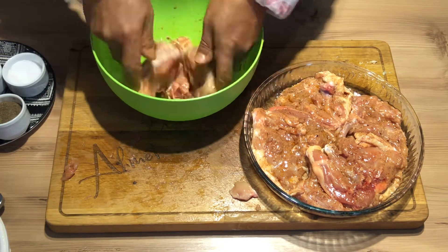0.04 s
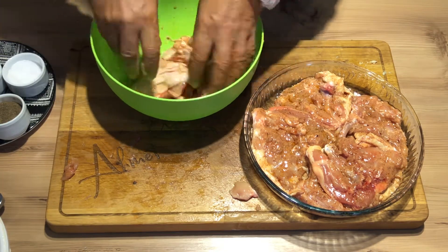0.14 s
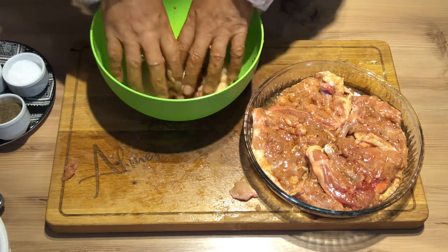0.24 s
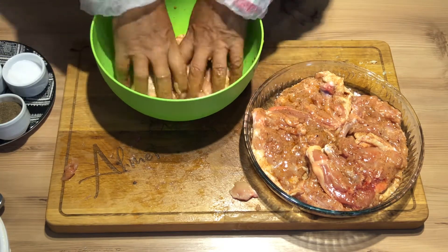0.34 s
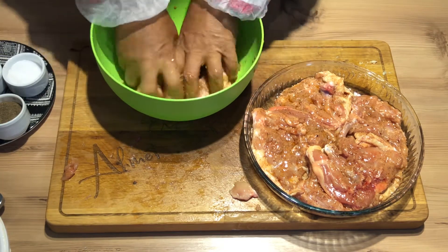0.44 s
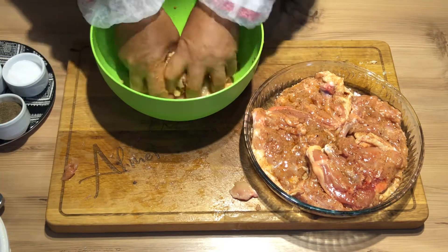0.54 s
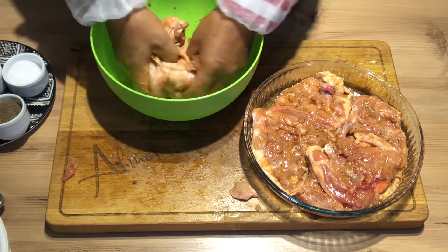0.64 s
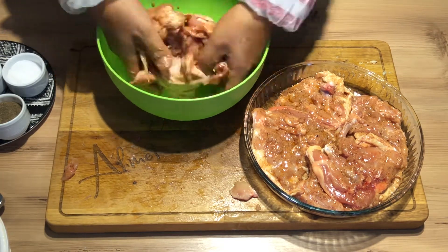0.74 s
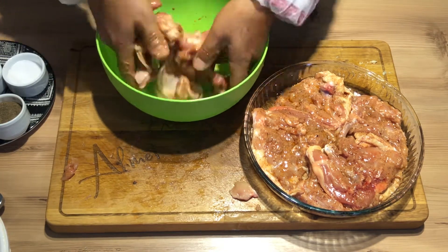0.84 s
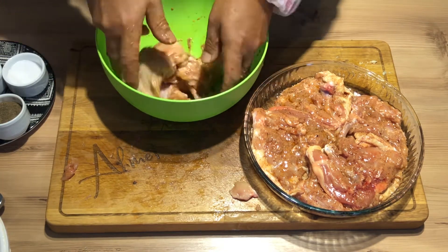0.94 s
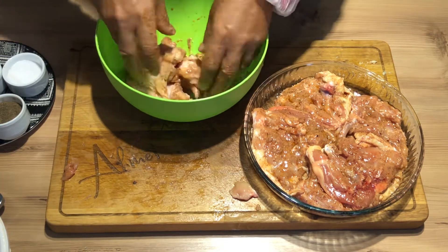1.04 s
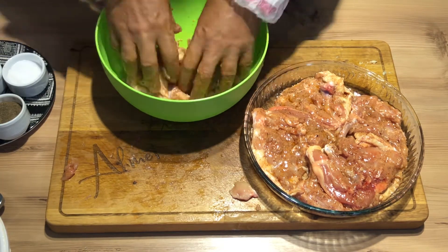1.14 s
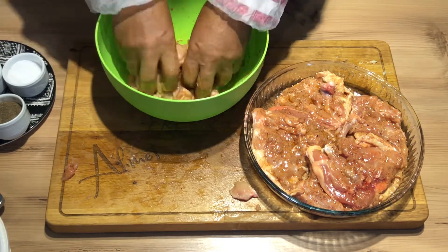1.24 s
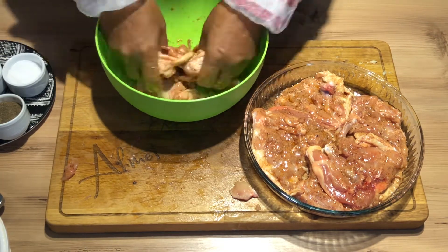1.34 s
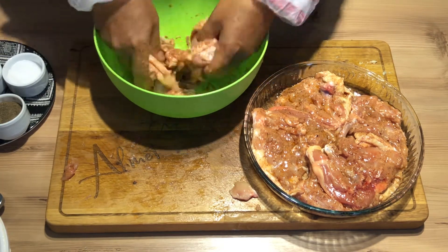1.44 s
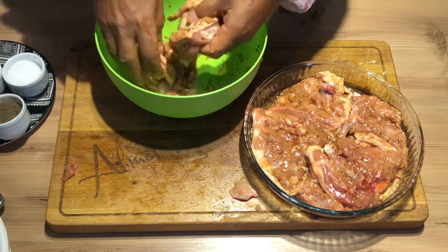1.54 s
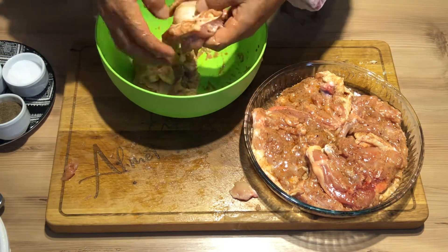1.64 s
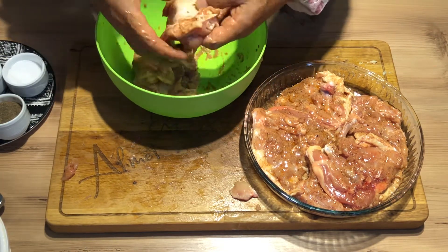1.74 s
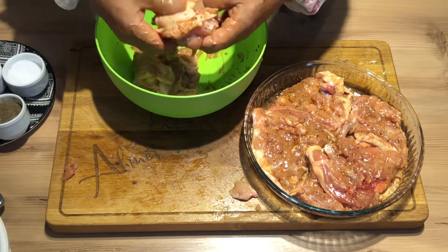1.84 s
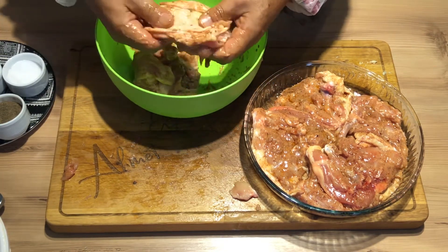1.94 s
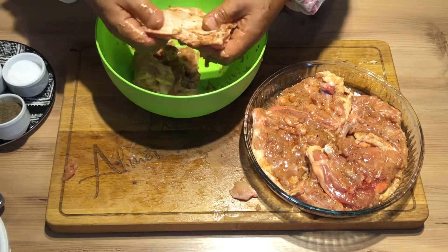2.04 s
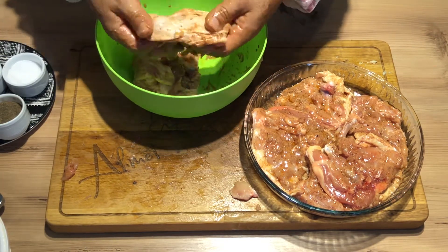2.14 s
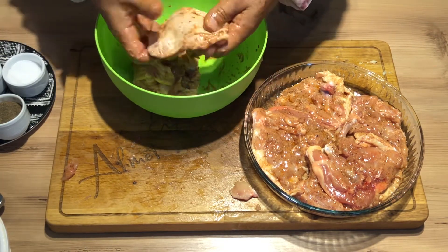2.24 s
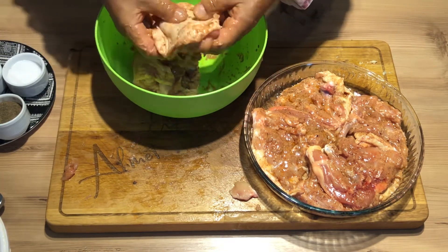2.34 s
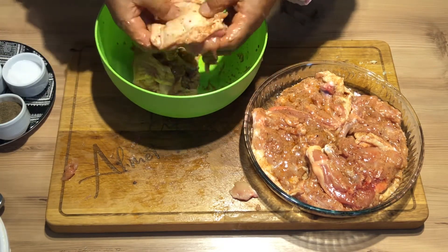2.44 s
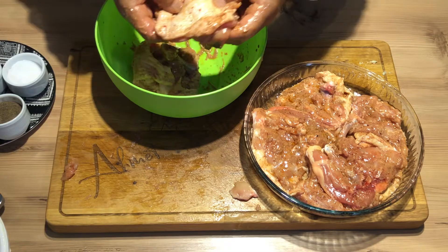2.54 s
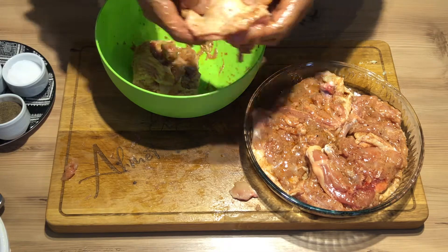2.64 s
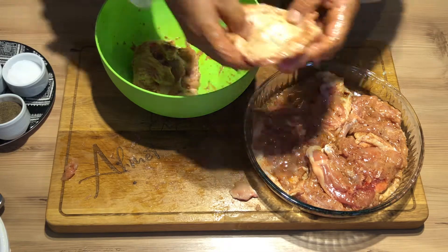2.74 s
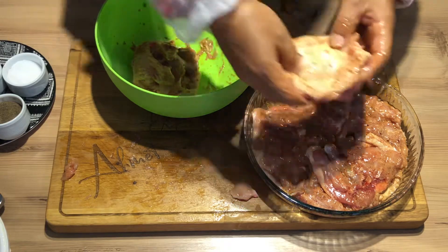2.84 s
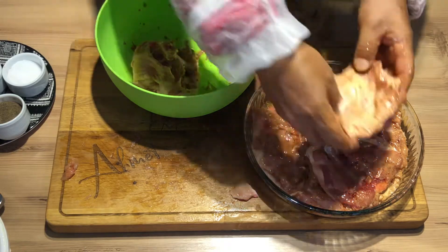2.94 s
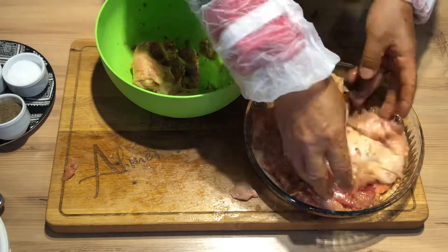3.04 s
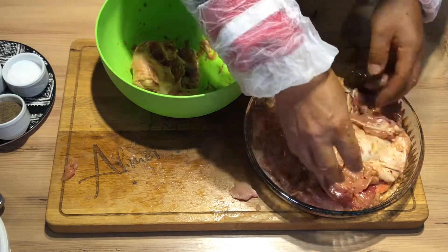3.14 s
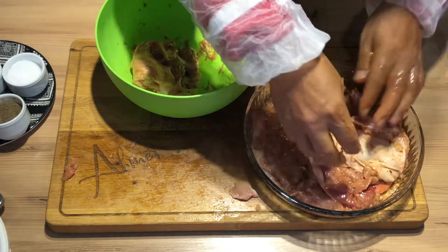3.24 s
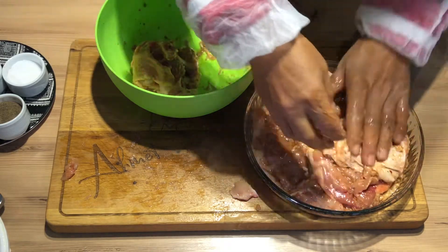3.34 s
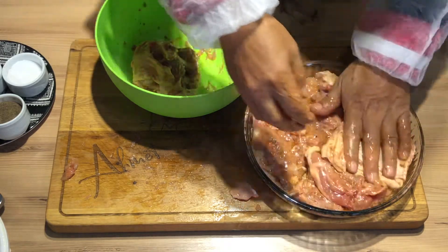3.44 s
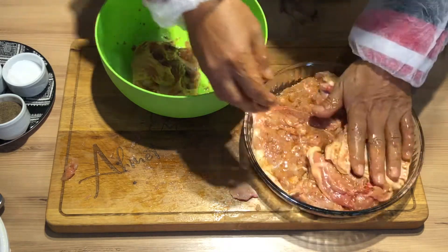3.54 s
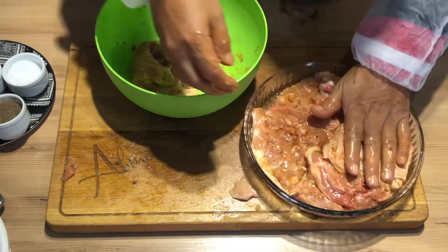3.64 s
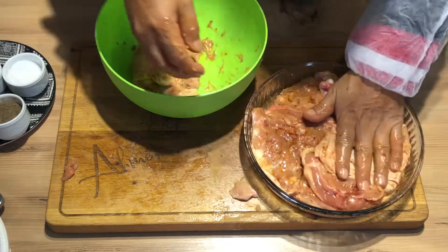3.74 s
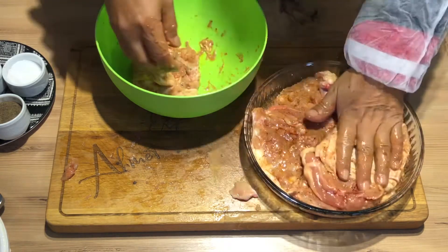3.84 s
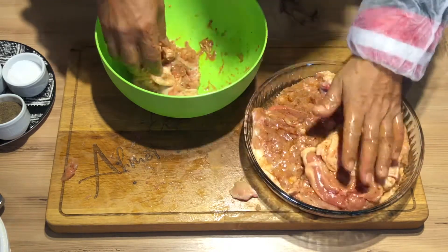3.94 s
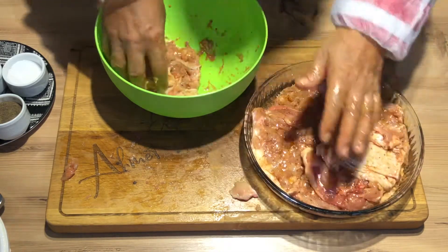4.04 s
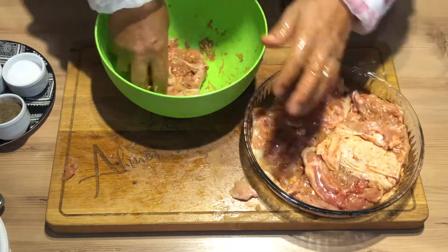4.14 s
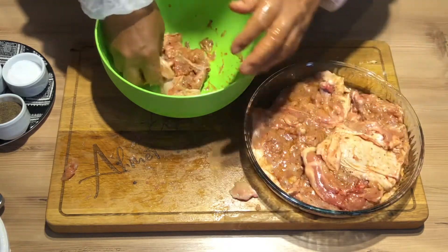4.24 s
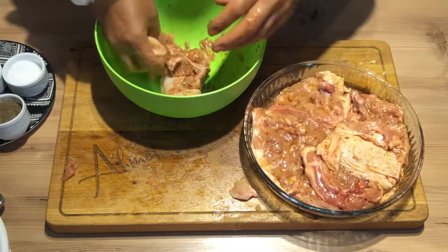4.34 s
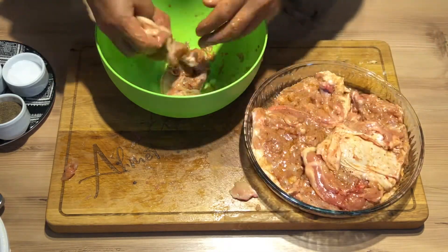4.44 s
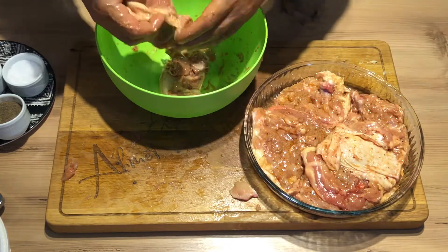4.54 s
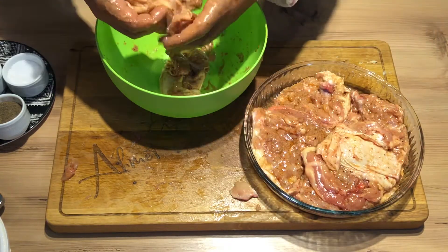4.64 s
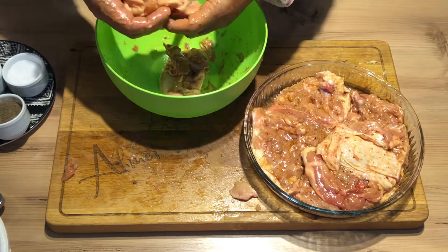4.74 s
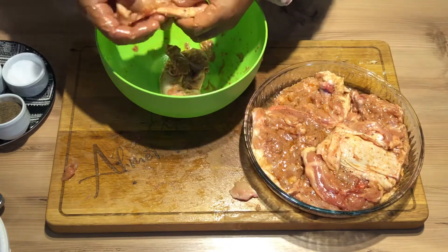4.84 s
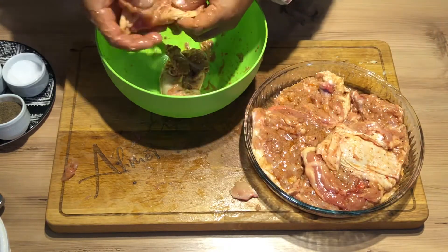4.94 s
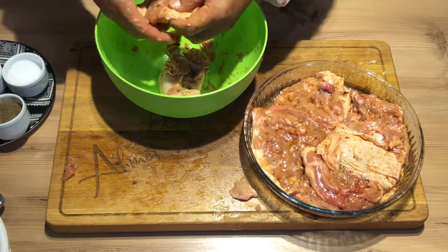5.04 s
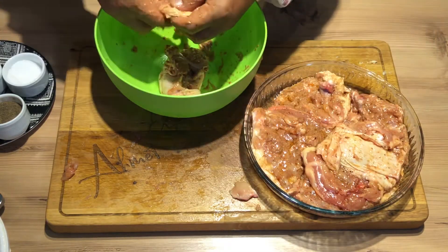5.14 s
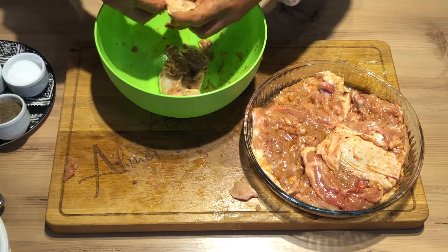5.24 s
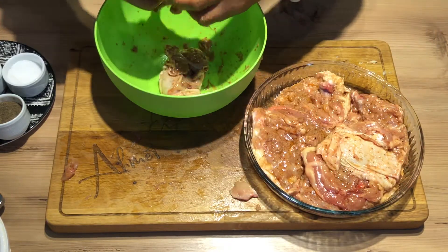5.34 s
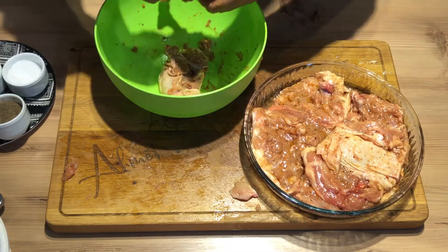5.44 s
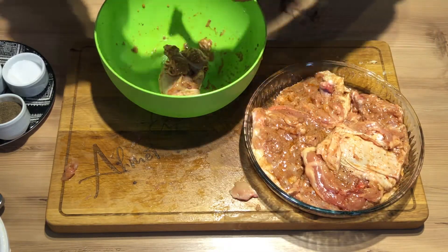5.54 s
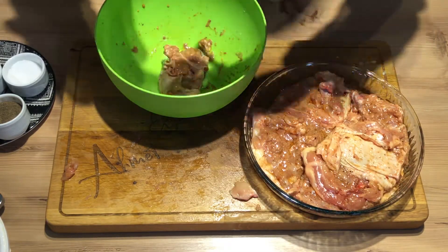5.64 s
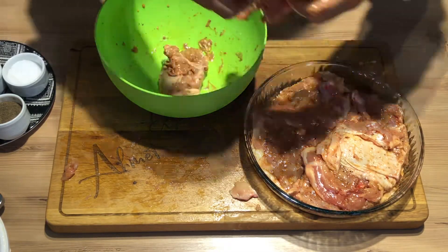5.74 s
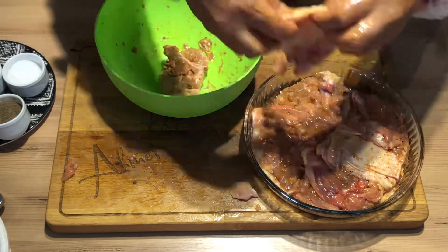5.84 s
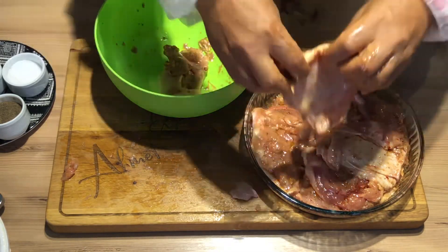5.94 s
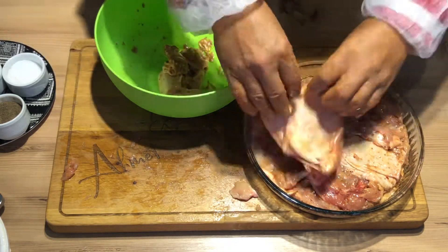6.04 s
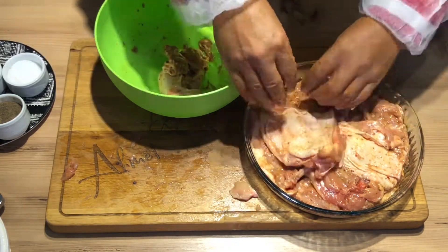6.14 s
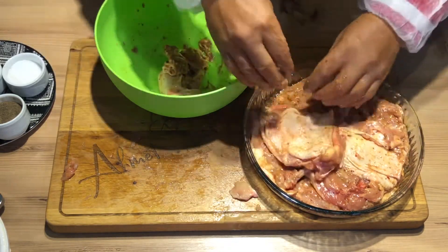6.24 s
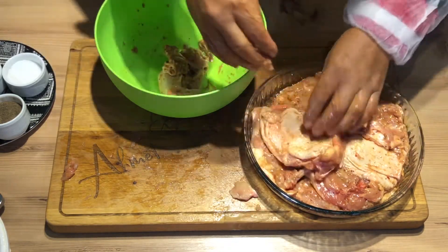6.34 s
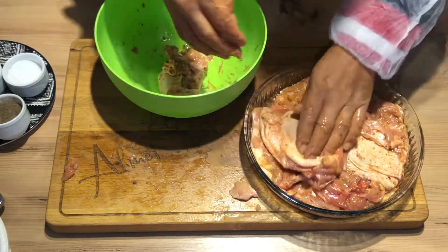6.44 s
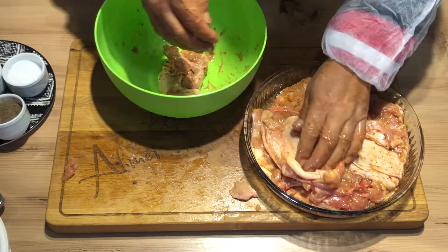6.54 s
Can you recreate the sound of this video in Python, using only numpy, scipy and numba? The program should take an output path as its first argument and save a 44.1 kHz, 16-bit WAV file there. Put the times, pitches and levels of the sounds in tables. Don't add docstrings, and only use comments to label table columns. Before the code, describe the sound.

A phone microphone hangs just above a wooden board in a small hard kitchen, with a faint steady fridge hum. From 0 to 1.6 seconds hands knead wet, sauce-covered meat in a plastic bowl: busy gulping pops, tearing crackles and squishes, with hollow bowl thuds, strongest near 0.76, 0.87 and 1.46, and low board bumps. From 1.7 to 2.9 it thins to sparse sticky ticks and tiny snaps. At 3.03 a loud suction smack bursts, a brief squeak and sharp crack with a hollow low pop, fizzing and echoing shortly. From 3.4 to 4.4 a palm presses and peels, with moist pops, squishes and crackles. From 4.5 to 6 only quiet sticky clicks remain, with a soft bowl knock at 5.1. At 6.08 a splashy wet slap makes a glass dish ring and chatter, fading under small ticks until about 6.6.

```python
import sys
import numpy as np
from scipy import signal
from scipy.fft import rfft, irfft
from scipy.io import wavfile
from numba import njit

SR = 44100
rng = np.random.default_rng(int(sys.argv[2]) if len(sys.argv) > 2 else 0)


def dump(signal):
    limited = np.clip(np.atleast_2d(signal).T, -1, 1)
    pcm = np.round(limited * 32767).astype(np.int16)
    wavfile.write(sys.argv[1], SR, pcm)


def level_to_linear(level):
    exponent = np.asarray(level, float) / 20
    return 10 ** exponent


N = 290619
TIME = np.arange(N) / SR

# [t/s, effort/dB, thinness of the sauce film/dB]
KNEADING = [(0.0, -57.5, -4), (0.11, -48.5, -9), (0.17, -60.5, -16), (0.27, -65.5, -5), (0.33, -53, -2.5),
            (0.92, -56.5, -5.5), (1.08, -64, -12), (1.25, -60, 2.5), (1.58, -64.5, -4.5), (1.8, -76, 3),
            (2.9, -69, -1), (3.65, -62.5, -8.5), (4.02, -66, -10), (4.06, -54.5, -6), (4.37, -68.5, 1.5),
            (4.99, -69, -14.5), (6.04, -66, -1.5), (6.59, -75, 1)]
# [t/s, peak level/dB,
# f/Hz]
POPS = [(0.0483, -37.5, 900), (0.0685, -35.5, 1120), (0.3661, -44, 890), (0.413, -34.5, 1550),
        (0.5556, -39, 1260), (0.5864, -40.5, 880), (0.6135, -31, 4940), (0.6598, -39, 1800),
        (0.7185, -47, 1670), (0.739, -36, 1700), (0.851, -45, 1020), (0.867, -35.5, 1000),
        (0.9065, -48, 1100), (1.1703, -45.5, 1530), (1.2511, -36, 5550), (1.2925, -37.5, 3500),
        (1.3061, -31, 5830), (1.35, -41, 2080), (1.3713, -39.5, 3060), (1.3987, -40.5, 3100),
        (1.445, -36, 1130), (1.4634, -45, 980), (1.5439, -39, 1310),
        (1.7607, -39, 5600), (1.8337, -40.5, 4550), (1.89, -39, 5540), (1.895, -51, 1780),
             (2.0103, -47, 6460), (2.111, -45, 5900), (2.1834, -49.5, 1540), (2.4372, -45.5, 3000),
             (2.8986, -49.5, 1300), (2.9118, -43.5, 1380), (2.9484, -33.5, 4640), (4.566, -48.5, 2160),
             (4.8051, -39.5, 2320), (4.8339, -31.5, 4070), (4.886, -38.5, 3140), (5.1054, -51, 1730),
             (5.202, -47.5, 3910), (5.2245, -47, 6220), (5.3652, -49, 4030), (5.9643, -50.5, 3950),
             (6.4428, -47, 6700), (6.48, -38.5, 2400),
        (3.374, -47, 1670), (3.4118, -38, 1850), (3.4417, -64, 1890), (3.461, -42, 4380),
              (3.5627, -44, 5240), (3.6495, -44.5, 4100), (3.6792, -34, 1080), (3.761, -32, 3800),
              (3.7958, -36.5, 3540), (3.8622, -38.5, 2300), (3.8805, -38, 3760), (3.902, -33.5, 1250),
              (3.926, -33, 5870), (4.15, -38.5, 3630), (4.1814, -33, 4970), (4.2289, -38, 5050),
              (4.2917, -36, 6700),
        (0.0483, -37, 1550), (.1012, -41, 2150), (.447, -35, 5400), (0.576, -39, 3340),
             (.866, -32.5, 1960), (.948, -32, 4740), (1.225, -43.5, 846), (1.464, -33, 1580),
             (1.6, -47, 800), (2.277, -49.5, 1670), (3.442, -42.5, 4300), (3.6785, -30.5, 3820),
             (3.775, -45, 1780), (3.902, -36.5, 4130), (4.042, -37.5, 2770), (4.805, -46, 4500),
             (4.306, -37.5, 6260)]
# [t/s, peak level/dB, f/Hz]
SNAPS = [(0.058, -33, 15000), (0.1016, -35.5, 7300), (0.2828, -50, 7850), (0.327, -43, 13100),
         (0.382, -37, 7660), (0.402, -37, 7200), (0.4467, -38, 7540), (0.4842, -41, 10500),
         (0.5306, -41, 13700), (0.7048, -43, 10200), (0.728, -34, 15500), (0.825, -44, 11100),
         (0.8484, -37, 9500), (0.8652, -38, 10500), (0.9094, -34, 13300), (0.943, -29, 13400),
         (1.1807, -45, 7140), (1.2044, -39.5, 7200), (1.2241, -41, 13600), (1.286, -45, 9850),
         (1.306, -37, 7450), (1.3637, -38, 10200), (1.5184, -54, 11900), (1.536, -46, 7640),
         (1.7599, -62, 7450), (1.8452, -51, 7700), (1.9565, -44, 13700), (1.972, -41.5, 11100),
              (2.0105, -42.5, 7340), (2.0476, -39, 12700), (2.172, -42, 13200), (2.226, -43, 10000),
              (2.2827, -48, 12000), (2.368, -42, 9500), (2.4089, -47, 9560), (2.7003, -48, 14100),
              (2.9472, -44, 9600), (2.9667, -45.5, 10600), (4.4922, -46, 15600), (4.6962, -52, 14200),
              (4.804, -53, 14200), (4.8333, -45.5, 7750), (4.8554, -43, 15300), (4.8955, -44, 9700),
              (4.914, -40.5, 10600), (5.1881, -48, 11500), (5.2899, -50, 15400), (5.493, -39.5, 11800),
              (5.6272, -53, 14600), (5.7786, -48, 14100), (6.3719, -50, 10900), (6.4582, -55, 10520),
              (6.5276, -48, 7690),
         (3.408, -40, 8000), (3.483, -51, 11200), (3.5432, -48, 9800), (3.5594, -43, 13800),
               (3.68, -40, 6850), (3.7355, -45, 12600), (3.7599, -52, 7440), (3.7738, -45, 9030),
               (3.7953, -49, 8640), (3.851, -37.5, 12400), (3.862, -39.5, 8500), (3.9017, -41, 8000),
               (3.924, -38.5, 9700), (4.0393, -56, 9750), (4.0617, -39, 15600), (4.108, -35.5, 10000),
               (4.133, -40, 12600), (4.1546, -36.5, 7040), (4.1966, -38, 10100), (4.271, -45, 11200),
               (4.2924, -39, 7000), (4.361, -46, 15000), (4.3775, -43, 10200), (4.3999, -43, 14400)]
# [t/s, level/dB]
FIZZ = [
    (3.026, -39),
    (6.085, -47),
]
# [t/s, peak level/dB, f/Hz]
SEALS = [(.3007, -31.5, 2270), (.4364, -32, 2300), (.4828, -37, 2600), (.5014, -32.5, 5400),
         (.5962, -37, 1790), (.615, -35, 6200), (.622, -38, 2800), (.665, -40, 2000), (.7195, -33.5, 5300),
         (.756, -29, 1960), (.943, -30.5, 2400), (1.2133, -29.5, 3450), (1.6, -39.5, 800),
         (2.2758, -34.5, 2940), (3.4615, -38.5, 4370), (3.706, -39, 5500), (4.0406, -36, 2190),
         (4.0595, -29.5, 2500), (4.162, -46, 3000), (4.118, -46, 2100), (5.2035, -43, 9000),
         (5.2255, -50, 7500), (5.248, -54, 9300), (6.063, -44, 2300), (6.064, -39, 5800),
         (6.071, -50, 3400), (2.79, -52, 8500), (2.972, -52, 5000)]
# [t/s, length/s, level/dB, f/Hz]
SQUISHES = [(.365, 0.083, -46.5, 2800), (.45, .1, -46.5, 2270), (.6, 0.086, -47.5, 3100),
            (.72, 0.052, -45, 1900), (.86, .03, -50, 2300), (1.45, 0.082, -50, 2170),
            (1.88, 0.06, -56.5, 2500), (2.28, .1, -55.5, 2300), (3.68, 0.044, -50, 3200),
            (4.06, 0.11, -47, 2300), (3.91, .06, -60, 2200), (3.68, .06, -47, 860), (4.05, .08, -53, 574),
            (3.9, .05, -54, 1280), (.38, .03, -48, 6500), (0.68, 0.044, -48, 5600), (2.9, 0.027, -57, 1400)]
# [t/s, peak level/dB, contact/ms, board thump re peak/dB]
KNOCKS = [(0.05, -25.5, 1.06, -15.5), (0.303, -35, 0.7, -15.5), (0.359, -38, 0.71, -14.5),
          (0.758, -19, 1.61, -20), (0.867, -20.5, 1.73, -26), (0.907, -30.5, 1.53, -10.5),
          (1.2, -45, 1.15, -18), (1.447, -26.5, 1.1, -16), (1.465, -19.5, 1.1, -24),
          (2.907, -44, 1.44, -20), (3.035, -52, 1.9, 0), (3.683, -46, 0.56, -3), (4.046, -36.5, 2, -12),
          (5.111, -32.5, 1.8, -14.5), (6.098, -34, 1.54, -5)]
# [f/Hz, level/dB, t60/s]
BOWL = [(356, -10, 0.11), (398, -5, 0.053), (440, -4.5, 0.053), (507.3, -3, 0.08), (560, -1, 0.085),
        (600, -2.5, 0.095), (666, -14, 0.04), (860, -19, .04), (1000, -28, .03), (1300, -27, 0.033)]
# [f/Hz, level/dB, t60/s]
BOARD = [(128.1, 0.5, 0.13), (150, -4, 0.19), (259.4, -7.5, 0.085)]
# [f/Hz, level/dB, t60/s]
FEET = [(65.6, -2.5, 0.14), (84, 3.5, 0.28), (96, -9, 0.19)]
# [t/s, peak level/dB]
BUMPS = [(.32, -48.5), (0.506, -42.5), (0.582, -52), (1.02, -53), (1.192, -56)]
# [t/s, level/dB]
LEANING = [
    (0, -48),
    (.08, -74),
    (.21, -54.5),
    (.57, -48.5),
    (1.04, -58),
    (1.4, -75),
    (1.9, -74),
    (6.59, -76),
]
# [t/s, level/dB, f/Hz, ring/cycles]
BOWL_WALL = [(.05, -38, 574, 35), (.303, -41, 536, 12), (.325, -45, 600, 16), (.359, -44, 600, 14),
             (.38, -46, 580, 14), (.758, -25, 462, 7), (.76, -39, 505, 35), (.867, -27, 486, 7),
             (.869, -42, 560, 30), (0.867, -41, 1000, 24), (.907, -32, 565.4, 14), (1.003, -44, 570, 20),
             (1.043, -47, 567, 20), (1.446, -38, 560, 20), (1.465, -29, 498.5, 16), (5.111, -41, 571, 30)]
SMACK_START = 3.028 + np.array([0, 2.5, 2.6, 2.6, 2.6, 2.6, 2.75, 2.9, 3.2, 3.4, 3.9, 4.1, 6.4, 8.8]) / 1000
# [peak level/dB,
# f/Hz, ring/cycles]
SMACK_POCKETS = [(-33, 3800, 26), (0.5, 3200, 6.8), (-15, 12200, 22), (-28, 9500, 13), (-20.5, 12000, 19),
                 (-32.5, 4100, 18), (-9, 2000, 8.5), (-7, 1750, 7.3), (-7.5, 1040, 10.5), (-9.5, 916, 9),
                 (-12, 736, 16), (-22, 3700, 18), (-40, 2300, 6.7), (-18, 7800, 8.8)]
# [t/s, level/dB, f/Hz, ring/cycles]
WHISTLE = [
    (3.018, -50, 3050, 120),
    (3.0284, -26, 3500, 60),
    (3.0308, -16, 4600, 12),
    (3.0322, -15, 3350, 24),
    (3.0345, -21, 4200, 14),
    (3.0311, -7, 1400, 7),
]
# [t/s, length/ms, peak level/dB, f/Hz]
SPLASHES = [(3.031, 9.1, -21, 9500), (6.0765, 1.96, -33, 1900), (6.081, 2.85, -23, 2420),
            (6.081, 5, -13, 6000), (6.081, 7.6, -15, 8400), (6.080, 9.7, -16, 9200),
            (6.084, 9.7, -28, 3600), (6.0905, 4, -18, 5800), (6.088, 6.16, -28.5, 1570),
            (6.085, 14, -27, 13500), (6.086, 14, -36.5, 740), (6.092, 20.08, -35, 360)]
# [t/s, level/dB, f/Hz, ring/cycles]
GLASS = [(6.082, -42, 2100, 100), (6.082, -37, 2423, 100), (6.083, -34, 2300, 230), (6.083, -34, 2540, 180),
         (6.083, -40, 2636, 200), (6.082, -35, 6200, 300), (6.09, -38, 5600, 250), (6.088, -44, 1450, 80)]
# [f/Hz, level/dB, width/Hz, t60/s]
CHATTER = [(2500, -46, 200, 0.59), (5550, -50, 300, .35), (6250, -53, 250, .3)]
# [f/Hz, t60/s, level/dB]
ROOM = [(124, 0.56, -19), (530, 0.48, -13), (800, 0.63, -14), (1180, 0.52, -17.5), (1900, 0.58, -16.5),
        (3050, 0.51, -15), (4500, 0.47, -15), (8000, 0.33, -18), (15000, 0.22, -13.5)]
# [delay/ms, level/dB]
ECHOES = [
    (3.8, -12),
    (10.8, -13.5),
    (14, -29),
    (18, -13),
]
# [f/Hz, level per Hz/dB]
AIR = [(15, -42), (25, 9), (65, 1), (186, -3.5), (238, 0.5), (431, -5.5), (581, -7.5), (666, -7),
       (1060, -8), (2380, -18.5), (3680, -21.5), (4330, -23.5), (5830, -22.5), (15100, -38), (16400, -31)]
# [f/Hz, level/dB, width/Hz]
HUM = [(96.1, -73, 3.7), (150.3, -72.5, 17), (239.5, -73, 4.4), (587.8, -72.5, 16), (3650, -83.5, 29),
       (5930, -81.5, 270)]


@njit
def rings(start, hz, t60, size, glide, rise, n, sr):
    out = np.zeros(n)
    for k in range(len(start)):
        i, z, shut = int(start[k] * sr), size[k] + 0j, 1.
        p = np.exp(2j * np.pi * hz[k] / sr - np.log(1000.) / (t60[k] * sr))
        turn = np.exp(2j * np.pi * hz[k] * glide[k] / (t60[k] * sr * sr))
        opening = np.exp(-hz[k] / (rise * sr))
        for j in range(i, min(n, i + int(t60[k] * sr))):
            out[j] += z.imag * (1 - shut)
            z *= p
            p *= turn
            shut *= opening
    return out


def bubbles(s, db, hz, cycles, glide=0.0255, rise=0.34):
    s, db, hz, cycles, glide = np.broadcast_arrays(*map(np.asarray, (s, db, hz, cycles, glide)))
    hz = np.clip(hz, 50., .4 * SR)
    t60 = np.maximum(cycles, 1) / hz
    return rings(1. * s, hz, t60, level_to_linear(db), 1. * glide, max(rise, .05), N, 1. * SR)


def coloured(points, size=N):
    hz, db = np.transpose(points)
    f = np.maximum(np.fft.rfftfreq(size, 1 / SR), 1)
    gain = level_to_linear(np.interp(np.log(f), np.log(hz), db))
    x = irfft(rfft(rng.standard_normal(size)) * gain, size)
    return x / x.std()


def line_noise(hz, width, floor_db):
    return coloured([(hz - 2 * width, floor_db), (hz - width / 2, -3), (hz, 0),
                     (hz + width / 2, -3), (hz + 2 * width, floor_db)])


def struck(force, modes):
    t = np.arange(SR // 2) / SR
    body = sum(level_to_linear(db) * np.sin(2 * np.pi * hz * t) * level_to_linear(-60 * t / t60) for hz, db, t60 in modes)
    return signal.fftconvolve(force, body)[:N]


def after(s, db, t60, rise):
    late = np.maximum(TIME[:, None] - s, 0)
    return (level_to_linear(db - 60 * late / t60) * (1 - np.exp(-late / rise))).sum(axis=1)


def pops():
    s, db, hz = np.transpose(POPS)
    chance = rng.random((len(s), 13))
    tick_db = -6.5 - 2.5 * np.log2(hz / 2000) - 4 * chance[:, 12]
    out = bubbles(s, db + 4.0, hz, 13.3, rise=0.78)
    for k in range(2):
        gulp_s = s + 0.001015 + .004 * chance[:, 8 + k]
        gulp_hz = hz * (0.914 + 0.27 * chance[:, 10 + k])
        out = out + bubbles(gulp_s, db - 2.5, gulp_hz, 13.2, rise=0.44)
    for k in range(4):
        tick_hz = 1500 * 9.34 ** ((k + chance[:, 4 + k]) / 4)
        out = out + bubbles(s + 0.0036 * chance[:, k], db + tick_db, tick_hz, 18.5)
    return out


def snaps():
    s, db, hz = np.transpose(SNAPS)
    chance = rng.random((len(s), 6))
    out = bubbles(s, db + 3.5, hz, 19, rise=2.5)
    for k in range(3):
        out = out + bubbles(s + 0.005 * chance[:, k], db, hz * (0.72 + 0.38 * chance[:, 3 + k]), 13.4)
    return out


def crackle(db, low_hz, high_hz, scatter_db, burst_s, count):
    burst, grain = rng.random((count, 3)), rng.random((count, 6, 3))
    start = (1 - burst[:, :1]) * (N - 1) / SR
    now_db = db[(start * SR).astype(int)]
    force = np.clip((now_db + 80.0) / 24, .15, 1)
    size_db = now_db + 1.9 * (1 - force) - 8 * grain[..., 0]
    size_db = size_db - force * scatter_db * np.log(burst[:, 1:2] + 0.043)
    hz = low_hz * (high_hz / low_hz) ** burst[:, 2:] * 2.58 ** (grain[..., 1] - .5)
    return bubbles((start + burst_s * grain[..., 2]).ravel(), size_db.ravel(), hz.ravel(), 13.9)


def squelch(effort_db, film_db):
    fizz = after(*np.transpose(FIZZ), t60=0.16, rise=0.00098)
    thin_db = 20 * np.log10(level_to_linear(effort_db + film_db) + fizz)
    low = crackle(effort_db, 825, 6570, 3.46, .006, count=2600)
    return low + crackle(thin_db + 4.5, 6360, 18300, 2.86, .006, count=3600)


def squish():
    s, db, hz = np.transpose(SEALS)
    out = bubbles(s, db + 4, hz * 1.13, 7.1, glide=-0.34, rise=0.29)
    out = out + bubbles(s + 0.00123, db - 3, hz * 0.78, 7.1, glide=-0.34, rise=.3)
    s, length, db, hz = np.transpose(SQUISHES)[..., None]
    chance = rng.random((len(SQUISHES), 40, 3))
    start = s + length * chance[..., 0] ** 1.3
    size_db = db - 3.43 * np.log(chance[..., 1] + 0.027)
    pocket_hz = hz * 2.62 ** (chance[..., 2] - .5)
    return out + bubbles(start.ravel(), size_db.ravel(), pocket_hz.ravel(), 9.0)


def knocks(effort_db):
    bowl, board = np.zeros(N), np.zeros(N)
    for s, db, ms, thump_db in KNOCKS:
        push = np.sin(np.pi * np.arange(0, 1, 1000 / SR / max(ms, .3)))
        push = push / push.sum()
        i = int(s * SR)
        bowl[i:i + len(push)] -= level_to_linear(db - 12) * push
        board[i:i + len(push)] -= level_to_linear(db + thump_db) * push
    s, db, _, thump_db = np.transpose(KNOCKS)
    board_db, rise_s = db + thump_db, 0.026
    lean = level_to_linear(np.interp(TIME, *np.transpose(LEANING)))
    rub = level_to_linear(effort_db - 3) + after(s, db - 26, 0.45, rise_s)
    flex = lean * level_to_linear(-14.5) + after(s, board_db - 1, 0.45, rise_s)
    rock = lean + after(s, board_db - 10, 0.61, rise_s)
    grains = (rng.random(N) < 250 / SR) * rng.standard_normal(N)
    bowl = bowl + level_to_linear(-14) * rub * grains
    board = board + level_to_linear(-34) * flex * rng.standard_normal(N)
    feet = level_to_linear(-38.0) * rock * rng.standard_normal(N)
    for s, db in BUMPS:
        feet[int(s * SR)] += level_to_linear(db)
    thin = signal.butter(3, 260, "high", fs=SR, output="sos")
    return signal.sosfilt(thin, struck(bowl, BOWL)) + struck(board, BOARD) + struck(feet, FEET)


def bowl_wall():
    return -bubbles(*np.transpose(BOWL_WALL), glide=0)


def suction_smack():
    pockets = -bubbles(SMACK_START, *np.transpose(SMACK_POCKETS), glide=-0.3, rise=0.55)
    pockets = signal.sosfilt(signal.butter(2, 550, "high", fs=SR, output="sos"), pockets)
    return pockets + bubbles(*np.transpose(WHISTLE), glide=0, rise=1.6)


def slap():
    out = 0
    for s, ms, db, hz in SPLASHES:
        chance = rng.random((14, 3))
        start = s + ms / 1000 * chance[:, 0]
        out = out + bubbles(start, db - 8 * chance[:, 1], hz * (0.79 + 0.33 * chance[:, 2]), 9.0)
    return out


def dish():
    out = bubbles(*np.transpose(GLASS), glide=0)
    out = out + kitchen(out)
    struck_s = np.array([6.084])
    for hz, db, width, t60 in CHATTER:
        out = out + line_noise(hz, width, -40) * after(struck_s, db, t60, .005)
    return out


def tail():
    t = np.arange(SR) / SR
    f = np.log(np.maximum(np.fft.rfftfreq(SR, 1 / SR), 1))
    noise = rfft(rng.standard_normal(SR))
    centres = np.log([hz for hz, _, _ in ROOM])
    out = 0
    for k, (hz, t60, db) in enumerate(ROOM):
        band = irfft(noise * np.interp(f, centres, np.arange(len(ROOM)) == k), SR)
        out = out + level_to_linear(db - 17.5) * band * level_to_linear(-60 * t / t60)
    out = out * np.clip(t / 0.0015, 0, 1)
    for ms, db in ECHOES:
        out[int(ms * SR / 1000)] += level_to_linear(db)
    return out


def kitchen(x):
    return signal.fftconvolve(x, tail())[:N]


def fridge():
    out = level_to_linear(-61.5) * coloured(AIR)
    for hz, db, width in HUM:
        out = out + level_to_linear(db) * line_noise(hz, width, -60)
    return out


def scene():
    s, effort, film = np.transpose(KNEADING)
    effort_db, film_db = np.interp(TIME, s, effort), np.interp(TIME, s, film)
    wet = pops() + snaps() + squelch(effort_db, film_db) + squish()
    loud = knocks(effort_db) + bowl_wall()
    smack = suction_smack()
    sideways = level_to_linear(-2.0) * signal.lfilter(*signal.butter(1, 4500, fs=SR), smack)
    reflected = kitchen(level_to_linear(-3) * wet + loud + sideways)
    sprays = slap() + sum(kitchen(slap()) for _ in range(4)) / 2
    return (wet + loud + smack + reflected + sprays + dish() + fridge())[None]


def roll_off(x):
    return signal.sosfilt(signal.butter(12, 16500, fs=SR, output="sos"), x)


def record(dry):
    dry = signal.sosfilt(signal.butter(5, 55, "high", fs=SR, output="sos"), dry)
    dry = dry + level_to_linear(-8.5) * signal.lfilter(*signal.iirpeak(15000, 3, fs=SR), dry)
    dry = signal.sosfilt(signal.ellip(8, .3, 60, 16100, fs=SR, output="sos"), dry)
    return roll_off(dry)


dry = scene()
out = record(dry)
dump(out)
```